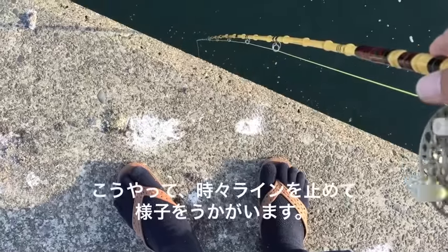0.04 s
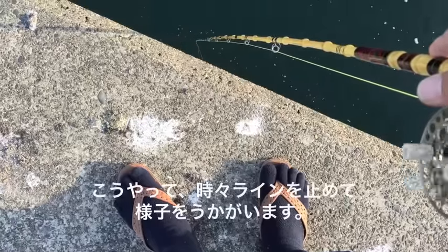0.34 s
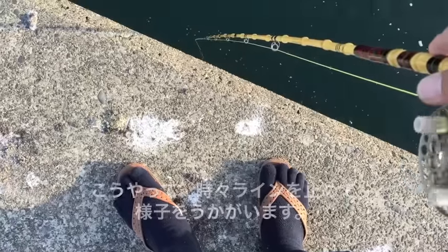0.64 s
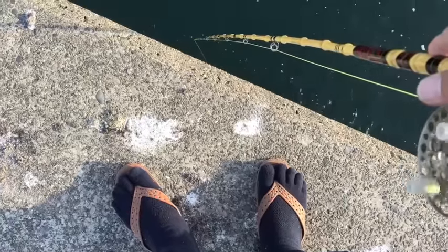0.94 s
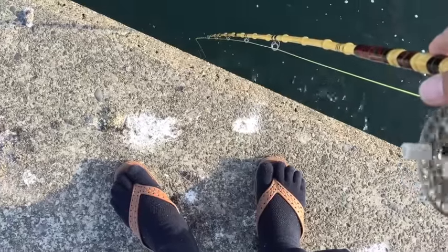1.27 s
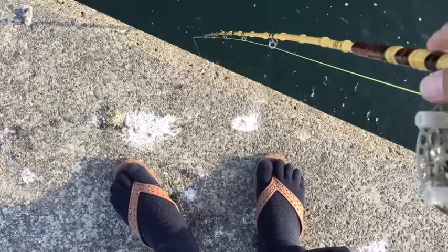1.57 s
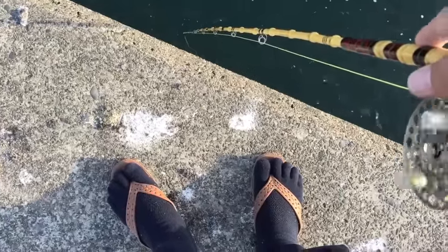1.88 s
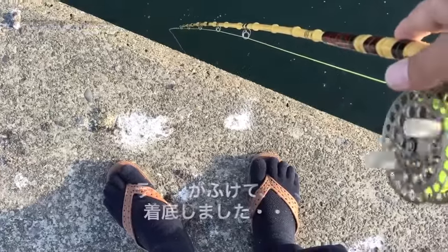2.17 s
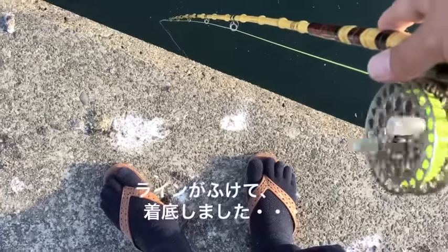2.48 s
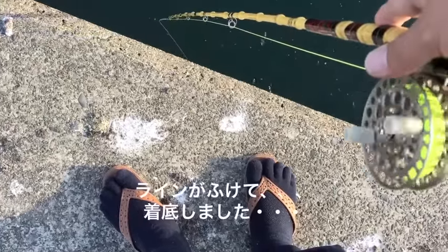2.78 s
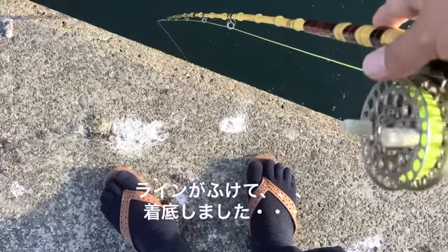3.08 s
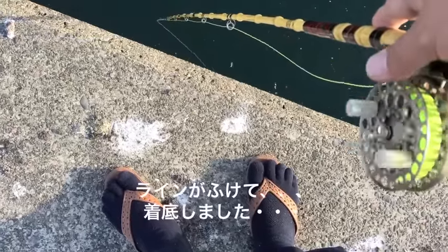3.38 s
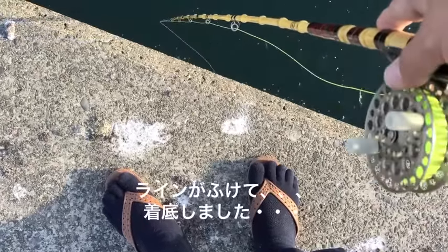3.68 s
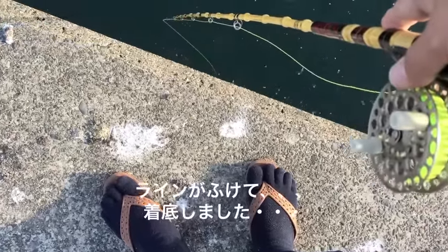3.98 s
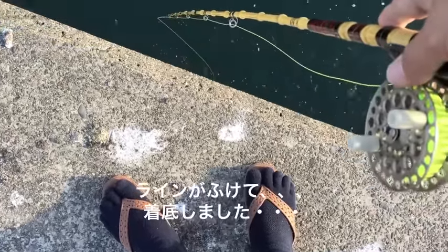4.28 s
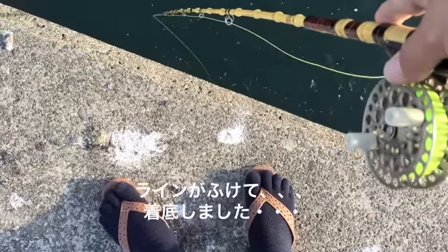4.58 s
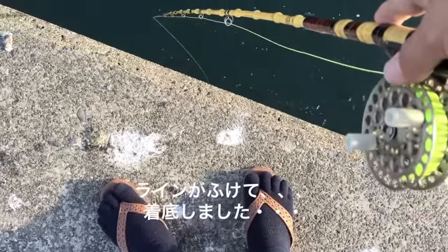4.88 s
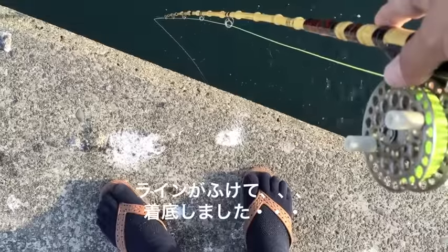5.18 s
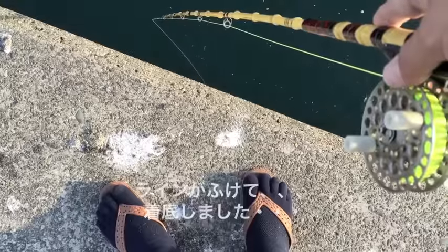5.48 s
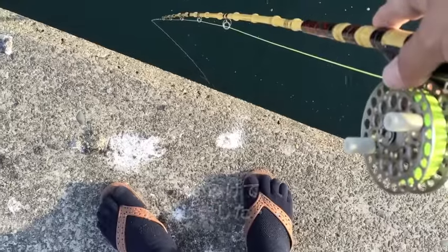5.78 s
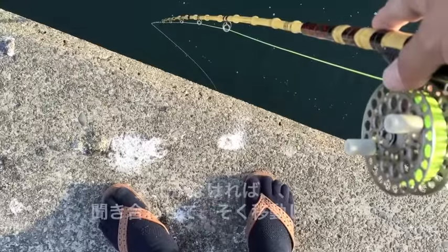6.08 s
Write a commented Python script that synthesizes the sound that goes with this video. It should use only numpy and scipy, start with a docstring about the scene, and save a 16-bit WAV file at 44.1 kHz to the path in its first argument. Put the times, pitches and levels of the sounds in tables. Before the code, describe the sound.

Distant engines drone low across a harbour while water softly laps, gurgles and spatters against a concrete wall.

```python
"""A concrete harbour seawall, with someone fishing from its edge.
Distant engines drone and beat over a steady low rumble and faint air. Water laps below as trapped air
rings in bubbles. Two small waves and a few weaker surges wash along the wall in fizz, gurgle and spray;
single drops plip in and between them. The reel whispers briefly as line rubs on the spool."""
import sys
import numpy as np
from scipy import signal
from scipy.fft import rfft, irfft, next_fast_len
from scipy.io import wavfile
from scipy.ndimage import uniform_filter1d

SR = 44100
rng = np.random.default_rng(int(sys.argv[2]) if len(sys.argv) > 2 else 0)


def output_pcm(signal):
    """Save a mono or channel-first signal as 16-bit PCM at the path in sys.argv[1].

    Samples are clipped to [-1, 1] before scaling.
    """
    pcm = np.clip(np.atleast_2d(signal).T, -1, 1) * 32767
    wavfile.write(sys.argv[1], SR, np.round(pcm).astype(np.int16))


N = 270941


def undb(db):
    """Decibels to gain."""
    return 10 ** (np.asarray(db) / 20)


def unit(x):
    """Scale to rms 1."""
    return x / np.sqrt(np.mean(x ** 2))


def colour(x, points):
    """Filter x by (freq_hz, gain_db) points; rms 1."""
    hz, db = np.transpose(points)
    size = next_fast_len(N)
    bin_hz = np.maximum(np.fft.rfftfreq(size, 1 / SR), 1)
    gain = undb(np.interp(np.log(bin_hz), np.log(hz), db))
    bass_rolloff = np.minimum(bin_hz / hz[0], 1)
    return unit(irfft(rfft(x, size) * gain * bass_rolloff, size)[:N])


def walk(rate_hz):
    """Random steps, smoothed twice; rms 1."""
    hold = int(SR / rate_hz)
    steps = np.repeat(rng.standard_normal(N // hold + 1), hold)
    return unit(uniform_filter1d(uniform_filter1d(steps, hold), hold)[:N])


def swell(full_s, rise_s, hold_s, fall_s):
    """Exponential rise to 1 at full_s, hold, exponential fall."""
    t = np.arange(N) / SR - full_s
    rising = np.minimum(t, 0) / max(rise_s, .002)
    falling = np.maximum(t - hold_s, 0) / max(fall_s, .002)
    return np.exp(rising - falling)


def add(out, start_s, sound):
    """Mix sound into out at start_s."""
    i = max(int(start_s * SR), 0)
    out[i:i + len(sound)] += sound[:max(N - i, 0)]


def bubble(hz, cycles, glide):
    """An air pocket rings, above half strength for `cycles`, rising in pitch as it nears the surface."""
    life_s = cycles / hz
    age = np.arange(int(5 * life_s * SR) + 4) / SR / life_s
    envelope = age * np.exp(-2.45 * age)
    pitch_hz = hz * (1 + glide * np.tanh(age - .5))
    return envelope / envelope.max() * np.sin(2 * np.pi * np.cumsum(pitch_hz) / SR)


def fizz(low_hz, high_hz, cycles, spread_db, count):
    """A crowd of bubbles, each with its own pitch, strength, ring and glide; rms 1."""
    out = np.zeros(N)
    for when, pitch, size, ring, rise in rng.random((count, 5)):
        hz = low_hz + (high_hz - low_hz) * pitch
        ring_cycles = cycles * 2 ** (2 * ring - 1)
        rarity = -np.log(max(size, .05))
        gain = undb(spread_db * rarity) * np.sqrt(hz / ring_cycles)
        add(out, when * N / SR, gain * bubble(hz, ring_cycles, glide=0.12 * rise))
    return unit(out)


# Engine tones: pitch_hz, level_db
ENGINE_TONES = [(60.3, -57), (73.5, -46), (85.3, -39), (93.2, -42.5), (120.3, -51), (170.7, -48.5),
                (186.5, -51), (201.3, -54.5), (332.5, -63.5), (386, -70.5), (403.5, -71)]
# Swell of the deep tones: time_s, gain_db
DEEP_SWELL = [(0, 1), (1.12, 1.5), (1.35, -4.5), (1.6, 1), (1.85, -6.5), (2.1, 1), (2.4, -2.5), (3.55, 1.5),
              (3.8, -8.5), (4.0, -5), (4.3, 2.8), (4.6, -2), (4.9, -1.5), (5.15, 2.5), (6.1, 2.7)]


def engines(deep_below_hz=130, throb_db=2):
    """Distant engine tones waver and beat; the drone swells and sinks on its way over the water."""
    t = np.arange(N) / SR
    deep_db = np.interp(t, *np.transpose(DEEP_SWELL))
    drone = 0
    for hz, db in ENGINE_TONES:
        phase = 2 * np.pi * (hz * t + rng.random()) + 0.72 * walk(8)
        tone_db = db + 1.7 * walk(13) + (deep_db if hz < deep_below_hz else 0)
        drone = drone + np.sqrt(2) * undb(tone_db) * np.sin(phase)
    return drone * undb(throb_db * walk(18) - 0.5)


# Harbour rumble and air spectra: freq_hz, gain_db
RUMBLE_EQ = [(15, -69.5), (25, -14.5), (48, -8.5), (69, -2), (86, -5), (99, -6.5), (118, -6), (145, -8),
             (180, -9.5), (211, -13.5), (335, -21.5), (393, -29), (429, -34), (599, -38.5), (800, -50),
             (1040, -70), (1760, -120)]
AIR_EQ = [(500, 5.5), (700, -3), (950, -0.5), (1400, -8), (2000, -12.5), (3000, -17), (4900, -21),
          (5600, -17.5), (7600, -21.5), (9500, -21), (10400, -26.5), (11300, -23), (15500, -26.5)]


def harbour(rumble_db=-36.5, air_db=-68):
    """Steady low rumble under a faint, wavering hiss of air."""
    rumble = undb(rumble_db) * colour(rng.standard_normal(N), RUMBLE_EQ)
    air = undb(air_db + .5 * walk(6.1)) * colour(rng.standard_normal(N), AIR_EQ)
    return rumble + air


# Surges at the wall: arrival_s, rise_s, hold_s, drain_s, splash_db, spray_db, heave_db, bubbles_db
SURGES = [(0.675, 0.055, 0.46, 0.05, -56, -64, -70, -61),
          (1.124, 0.054, 0.262, 0.04, -53.5, -62.5, -47, -64.5),
          (2.784, 0.23, 0.32, 0.069, -72, -97, -63, -72), (3.632, 0.02, 0.015, 0.016, -62.5, -77, -68, -72),
          (3.862, 0.082, 0.27, 0.11, -67.5, -71, -55, -67),
          (3.949, .003, 0.021, .01, -61.5, -64, -59.5, -68),
          (4.285, .006, .02, 0.065, -65, -67.5, -65, -69), (4.67, .02, 0.17, 0.06, -78, -94, -62, -82),
          (5.24, 0.0059, 0.009, 0.015, -68, -73, -65, -82)]


def waves(calm_splash_db=-78, calm_heave_db=-65, calm_bubbles_db=-77):
    """Gains of splash, spray, heave and bubbles: each surge builds to a crest and drains back to calm."""
    splash, spray, heave, bubbles = undb(calm_splash_db), 0, undb(calm_heave_db), undb(calm_bubbles_db)
    for arrival_s, rise_s, hold_s, drain_s, splash_db, spray_db, heave_db, bubbles_db in SURGES:
        foam = undb(-13) * swell(arrival_s, 0.19, hold_s, 0.14)  # weaker fizz ahead and behind
        contact = np.maximum(swell(arrival_s, rise_s, hold_s, drain_s), foam)
        crest_s = arrival_s + 0.49 * hold_s
        splash = np.hypot(splash, undb(splash_db) * contact)
        spray = np.hypot(spray, undb(spray_db) * contact)
        heave = np.hypot(heave, undb(heave_db) * swell(crest_s, rise_s=0.15, hold_s=0, fall_s=0.15))
        bubbles = np.hypot(bubbles, undb(bubbles_db) * swell(crest_s, rise_s=0.26, hold_s=0, fall_s=0.3))
    return splash, spray, heave, bubbles


# Heaving water spectrum: freq_hz, gain_db
SLOSH_EQ = [(180, -18), (300, 1), (400, -1.5), (600, -13.5), (750, -16), (950, -15.5), (1400, -38.5),
            (2200, -46)]


def slosh(gain):
    """Large air pockets ring as the water heaves."""
    return gain * colour(fizz(200.1, 1297, cycles=10.4, spread_db=6, count=2400), SLOSH_EQ)


# Open-water bubble spectrum: freq_hz, gain_db
TRICKLE_EQ = [(350, 1), (550, 3.5), (750, 9), (1000, 2), (1400, 1.1), (2100, -1), (2700, -7.5),
              (3300, -12.5), (4200, -12.5), (5500, -16), (7500, -25)]


def trickle(gain, cluster_db=2):
    """Small bubbles keep bursting in clusters: a soft lapping."""
    bubbles = fizz(400, 6000, cycles=7, spread_db=3.3, count=5000)
    return gain * undb(cluster_db * walk(24) + 0.4) * colour(bubbles, TRICKLE_EQ)


# Splash and spray spectra: freq_hz, gain_db
SPLASH_EQ = [(250, -6.5), (520, 5.5), (720, -8), (950, 0), (1400, -0.5), (2000, 0.5), (2700, -3),
             (3200, -4), (3700, -4.5), (4500, -11), (5500, -20.5), (9000, -33)]
SPRAY_EQ = [(2500, -17.5), (3700, 3.5), (4900, -4.5), (5500, 0.5), (6500, -3), (7500, -12.5), (9300, -12.5),
            (10400, -21), (11500, -15.5), (15500, -28.5)]


def wash(splash_gain, spray_gain):
    """Water breaks on concrete in quick spurts: dense bubbles and spray over a smooth rush."""
    spurts = walk(90)
    splash = fizz(395, 5810, cycles=3.66, spread_db=3, count=14000) + undb(-5) * rng.standard_normal(N)
    spray = fizz(3500, 15000, cycles=5.5, spread_db=6.5, count=6000) + undb(2) * rng.standard_normal(N)
    return (splash_gain * undb(-2.5 + 1.2 * spurts) * colour(splash, SPLASH_EQ)
            + spray_gain * undb(-6.5 + 2.1 * spurts) * colour(spray, SPRAY_EQ))


# Trapped-air spectrum: freq_hz, gain_db
GURGLE_EQ = [(350, -7.5), (550, 1.5), (800, -1.5), (1200, -6), (1700, -6.5), (2600, -23)]


def gurgle(splash_gain, lag_s=0.046, gain_db=-10):
    """Air folded under by the splash rings a moment later as mid-sized bubbles."""
    t = np.arange(N) / SR
    trapped = np.interp(t - lag_s, t, splash_gain)
    bubbles = fizz(450, 2000, cycles=8, spread_db=4.5, count=2400)
    return trapped * undb(gain_db) * colour(bubbles, GURGLE_EQ)


# Drops and single bubbles: start_s, level_db, pitch_hz, ring_cycles, glide_ratio
PLIPS = [(0.11, -53.5, 2520, 2.7, .08), (0.2303, -50, 2540, 9.9, 0.044), (0.38, -50.5, 2510, 3, .08),
         (0.4362, -46, 1710, 2.3, 0.23), (0.4365, -56, 4100, 6.6, .05), (0.476, -50, 1310, 3.6, .08),
         (0.5383, -49, 3600, 6.8, .08), (0.572, -51.5, 1890, 4.3, .08), (0.606, -52, 850, 20, .03),
         (0.645, -35.5, 3080, 2.8, .08), (0.6577, -38, 3370, 2.1, .08), (0.6695, -44, 3600, 3.5, .08),
         (0.691, -41, 3000, 2.5, .08), (0.7085, -44, 4130, 3, .08), (0.713, -50, 1310, 10, .08),
         (0.7377, -39, 4200, 3.9, .08), (0.7773, -32, 2420, 1.6, .08), (0.819, -37, 3420, 2.7, .08),
         (0.8325, -41, 3960, 2.5, .08), (0.866, -43, 1100, 7, .05), (0.891, -40, 2300, 2.5, .08),
         (0.9275, -51, 3450, 2.5, .08), (1.024, -35, 3300, 1.6, .08), (1.036, -47, 1180, 10, .08),
         (1.107, -32.5, 2680, 4.5, 0.074), (1.108, -32.5, 3660, 5, .08), (1.129, -39, 2580, 3, .08),
         (1.150, -50, 940, 7.2, .08), (1.188, -41.5, 575, 9.6, 0.15), (1.1935, -37, 3570, 2.3, .08),
         (1.220, -37, 2900, 2, .08), (1.250, -35, 305, 15.5, 0.069), (1.252, -33.5, 3450, 2.5, .08),
         (1.281, -46, 590, 9, 0.13), (1.2885, -38, 2930, 2.2, .08), (1.305, -35.5, 1500, 3.7, 0.094),
         (1.3062, -37, 2430, 2.6, .08), (1.340, -39, 1740, 3.5, .2), (1.348, -40, 1440, 2.7, .08),
         (1.3615, -53, 5510, 4.6, .05), (1.376, -46, 3500, 2.2, .08), (1.385, -31, 2590, 1.6, 0.073),
         (1.534, -57, 3620, 6.6, .08), (1.584, -56, 2200, 4, .08), (1.598, -57, 920, 12, 0.043),
         (2.6255, -43, 1470, 3.1, .15), (2.7384, -59, 3580, 18, .02), (2.787, -54, 2000, 5, 0.19),
         (2.789, -57, 2660, 8, .05), (2.825, -59, 2050, 5, .08), (2.8255, -59, 5370, 7, .03),
         (2.8494, -56, 5380, 12, .03), (2.878, -56, 2380, 5, 0.27), (2.954, -56, 2060, 10, .03),
         (3.0536, -49, 2310, 2.9, .08), (3.116, -51, 2230, 8, 0.44), (3.198, -59, 3620, 5, .15),
         (3.393, -57, 2560, 6, 0.074), (3.468, -57, 2570, 5, 0.2), (3.601, -47, 4360, 4.1, .08),
         (3.627, -51, 1730, 7, .1), (3.642, -37.5, 3030, 1.4, .08), (3.6625, -52, 3450, 4, .08),
         (3.8875, -43, 2050, 5.1, 0.073), (3.888, -48, 5600, 4, .08), (3.9095, -48, 3750, 3, .08),
         (3.910, -50, 6370, 6, .05), (3.948, -45, 603, 9, 0.056), (3.969, -43, 4000, 3, .2),
         (4.007, -36, 1700, 5, 0.42), (4.0138, -37, 1550, 6.1, 0.068), (4.025, -35, 2880, 3.6, 0.074),
         (4.026, -52, 6700, 5, .08), (4.056, -29, 2200, 2.6, 0.11), (4.095, -51, 5460, 4, .08),
         (4.136, -49, 1230, 3.5, .1), (4.1612, -42, 4550, 4.4, .08), (4.164, -45, 2410, 4, .08),
         (4.232, -43.5, 2400, 4.3, .08), (4.277, -49, 4070, 3.5, .15), (4.2948, -42, 2050, 5.6, 0.44),
         (4.299, -48, 2600, 5.5, .15), (4.3769, -55, 5700, 6.4, 0.074), (4.3896, -46, 2720, 1.9, .08),
         (4.677, -59, 3800, 10, .03), (4.6804, -48, 2480, 2.1, .08), (4.708, -56.5, 1140, 11.5, .04),
         (4.7695, -52, 2930, 6.1, .06), (5.095, -53, 610, 10, 0.22), (5.11, -57.5, 2650, 7.1, .08),
         (5.134, -59, 2080, 5.4, .08), (5.247, -53.5, 900, 5.6, .08), (5.414, -58.5, 2410, 4.1, .08),
         (5.5952, -55.5, 5100, 6, .08), (5.791, -51.5, 3070, 4.3, .08), (5.8114, -51.5, 2340, 6, 0.057),
         (5.848, -58.5, 6350, 9, .05), (5.999, -55, 3550, 6, .08), (6.0154, -58, 5250, 11, 0.054)]


def drops(gain_db=-5, satellites=5, satellite_db=-16.5, spread_s=.005, spread_octaves=0.27):
    """Each drop rings a rising plip; fainter satellite bubbles pinch off around it."""
    out = np.zeros(N)
    for start_s, level_db, pitch_hz, cycles, glide in PLIPS:
        add(out, start_s, undb(level_db) * bubble(pitch_hz, cycles, glide))
        for offset, detune in rng.standard_normal((satellites, 2)):
            satellite = bubble(pitch_hz * 2 ** (spread_octaves * detune), cycles=2.2, glide=glide)
            add(out, start_s + spread_s * offset, undb(level_db + satellite_db) * satellite)
    return undb(gain_db) * out


# Droplet tick and fine mist spectra: freq_hz, gain_db
TICK_EQ = [(1200, -10), (2400, -2), (3700, 3), (4800, -11), (5700, -6.5), (7500, -21)]
MIST_EQ = [(4000, -20), (6500, 5), (9000, 2), (10400, -5), (11800, -8), (15500, -10.5)]


def crackle(spray_gain, tick_db=-5, speck_db=-21.5, speck_count=400):
    """Spray lands as sharp pitched ticks and fine bright specks."""
    ticks = fizz(1500, 7000, cycles=1.8, spread_db=6, count=800)
    specks = np.zeros(N)
    for when, size in rng.random((speck_count, 2)):
        rarity = -np.log(max(size, .05))
        add(specks, when * N / SR, np.array([undb(7 * rarity)]))
    return spray_gain * (undb(tick_db) * colour(ticks, TICK_EQ) + undb(speck_db) * colour(specks, MIST_EQ))


# Spatters on concrete: peak_s, strike_db, decay_s, mist_db
SPATTER_HITS = [(0.7377, -50.5, 0.002, -62), (0.747, -62, .005, -65), (0.862, -52, 0.0044, -75),
                (0.928, -53, .002, -74), (0.946, -46.5, 0.0031, -60), (0.974, -56, .003, -68),
                (1.105, -54, .003, -69), (1.135, -57, 0.015, -68), (1.193, -54, .002, -75),
                (1.252, -47.5, 0.0041, -73), (1.287, -53, .005, -74), (1.321, -69, .005, -66),
                (1.352, -58, 0.0018, -77), (3.527, -65.5, .003, -80), (3.553, -75, .002, -83),
                (3.642, -63, 0.0024, -72), (3.8887, -56.5, 0.0018, -77), (3.909, -66, 0.002, -75),
                (3.946, -60, .002, -78), (3.954, -58.5, .006, -75), (4.056, -64, .002, -73),
                (4.095, -62, .002, -81), (4.162, -60, 0.0022, -77), (4.2955, -68, 0.0036, -81),
                (4.760, -75, .004, -88), (5.242, -63, .003, -88), (5.255, -59.5, 0.0033, -83)]
# Strike spectrum: freq_hz, gain_db
STRIKE_EQ = [(900, -7), (2000, 7.5), (4000, 8), (6200, 2.5), (7600, -15.5), (9500, -21), (15000, -30)]


def spatters():
    """Flung water strikes the wall and spits a grainy mist."""
    strike, mist = 0, 0
    for peak_s, strike_db, decay_s, mist_db in SPATTER_HITS:
        burst = swell(peak_s, rise_s=.002, hold_s=0, fall_s=decay_s)
        strike = strike + undb(strike_db) * burst
        mist = mist + undb(mist_db) * burst
    grains = fizz(5000, 15000, cycles=2, spread_db=-1.5, count=9000)
    return strike * colour(rng.standard_normal(N), STRIKE_EQ) + mist * colour(grains, MIST_EQ)


# Line-on-spool spectrum: freq_hz, gain_db
REEL_EQ = [(1500, -28.5), (3000, -8.5), (4100, 1), (5000, -8), (6200, -8.5), (8000, -12), (15000, -17)]


def reel(level_db=-78.5):
    """Line and spool rub softly as the reel speeds up, runs and coasts down."""
    speed = swell(full_s=2.33, rise_s=0.24, hold_s=.2, fall_s=0.28)
    return speed * undb(level_db + 1.1 * walk(25)) * colour(rng.standard_normal(N), REEL_EQ)


def wall_scatter(x, gain_db=-6, early_decay_s=0.014, late_decay_s=.025, ripple_s=.03):
    """Wall and water surface add a short tail that changes with every ripple."""
    t = np.arange(SR // 6) / SR
    decay = np.exp(-t / early_decay_s) + 0.32 * np.exp(-t / late_decay_s)
    scattered, hop = np.zeros(N), int(ripple_s * SR)
    for i in range(0, N - 2 * hop, hop):
        tail = rng.standard_normal(len(t)) * decay
        frame = x[i:i + 2 * hop] * np.hanning(2 * hop)
        add(scattered, i / SR, signal.fftconvolve(frame, tail / np.linalg.norm(tail)))
    return x + undb(gain_db) * scattered


def scene():
    """Mono mix at the top of the wall."""
    splash, spray, heave, bubbles = waves()
    surface = wash(splash, spray) + trickle(bubbles) + drops() + spatters()
    water = wall_scatter(surface) + gurgle(splash) + slosh(heave)
    return (engines() + harbour() + water + crackle(spray) + reel())[None]


def record(dry, low_hz=36, high_hz=15600, fade_s=.003):
    """Band-limit and fade both ends."""
    highpass = signal.butter(5, low_hz, "high", fs=SR, output="sos")
    lowpass = signal.ellip(10, .2, 80, high_hz, fs=SR, output="sos")
    edge_s = np.minimum(np.arange(N), np.arange(N)[::-1]) / SR
    fade = np.minimum(edge_s / fade_s, 1)
    return signal.sosfilt(lowpass, signal.sosfilt(highpass, dry) * fade)


dry = scene()
out = record(dry)
output_pcm(out)
```